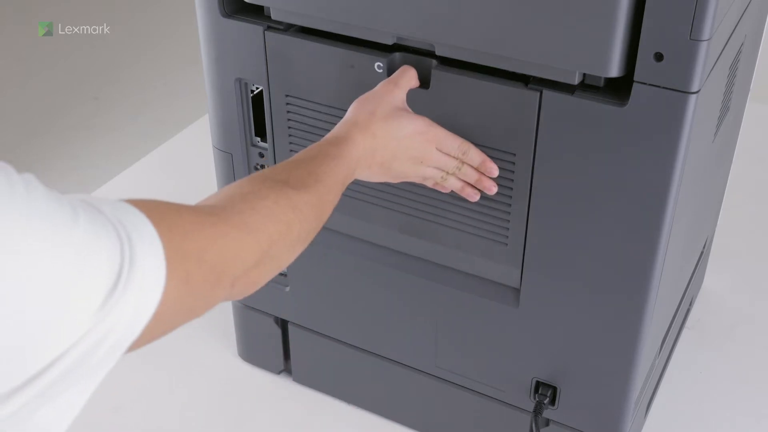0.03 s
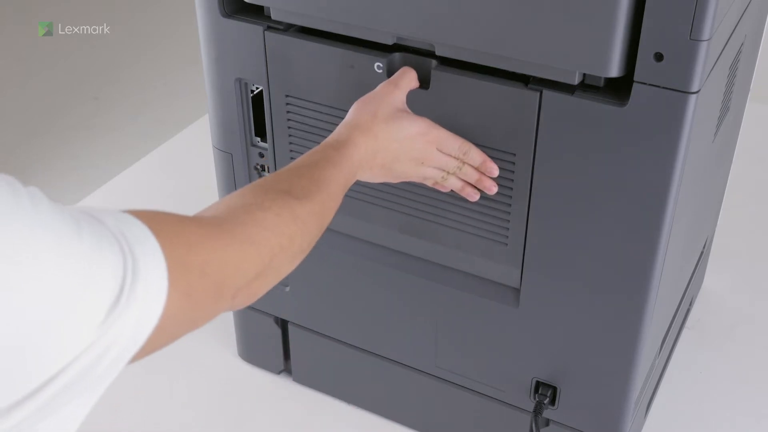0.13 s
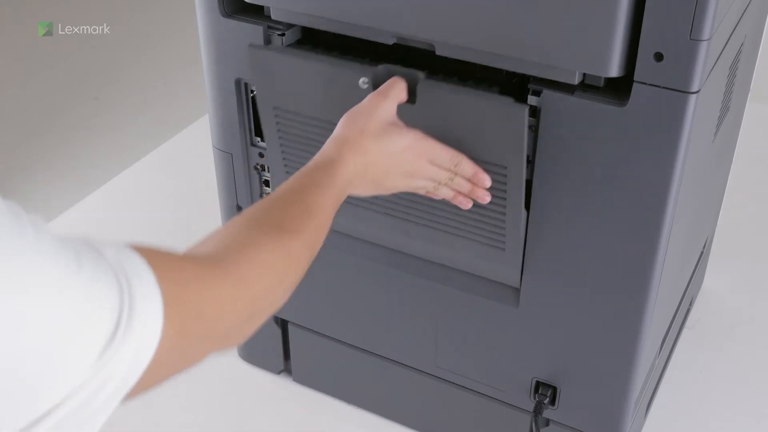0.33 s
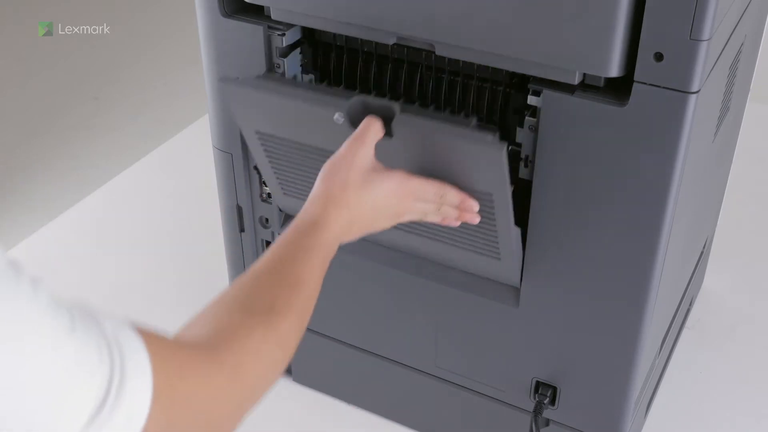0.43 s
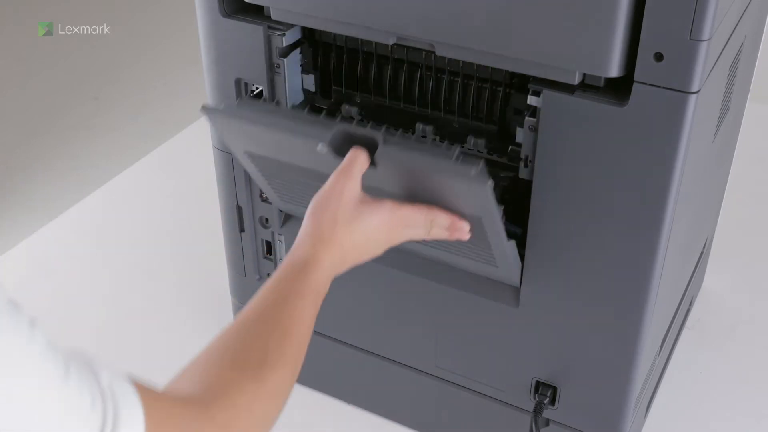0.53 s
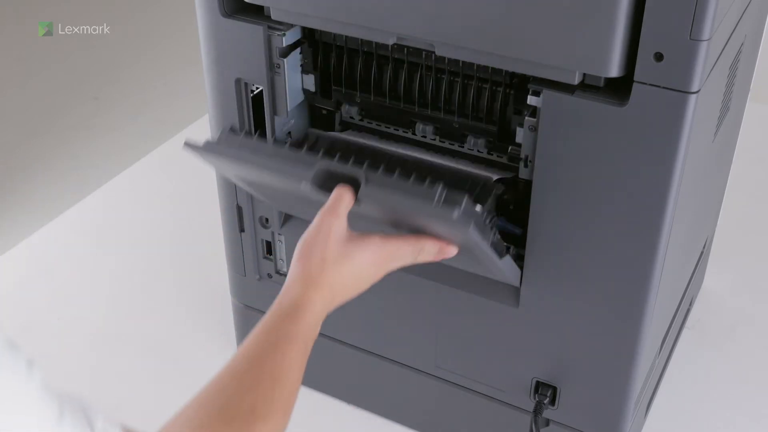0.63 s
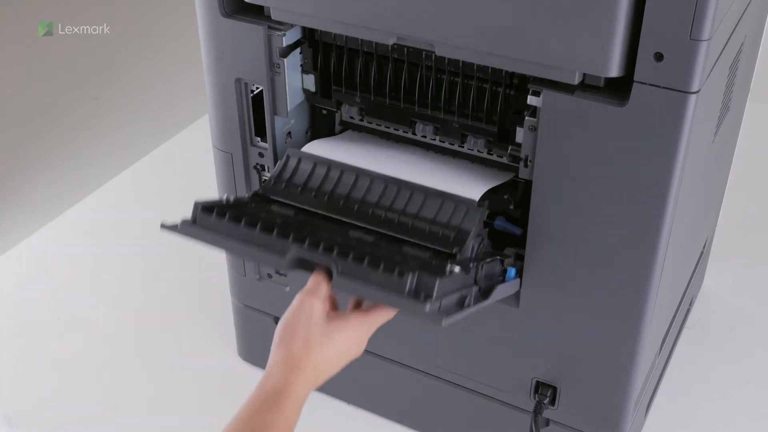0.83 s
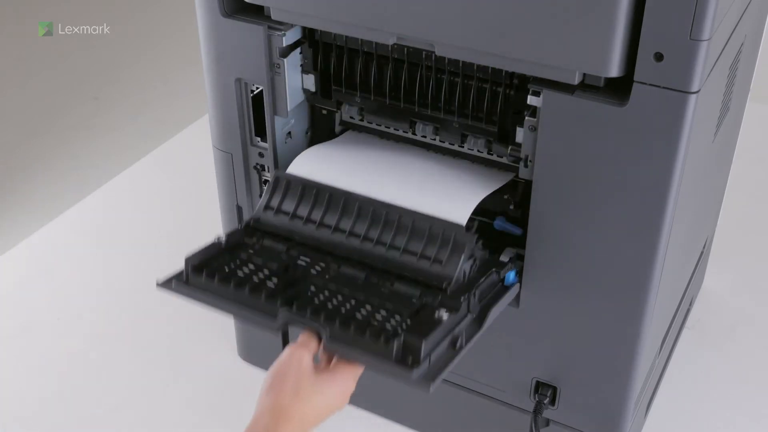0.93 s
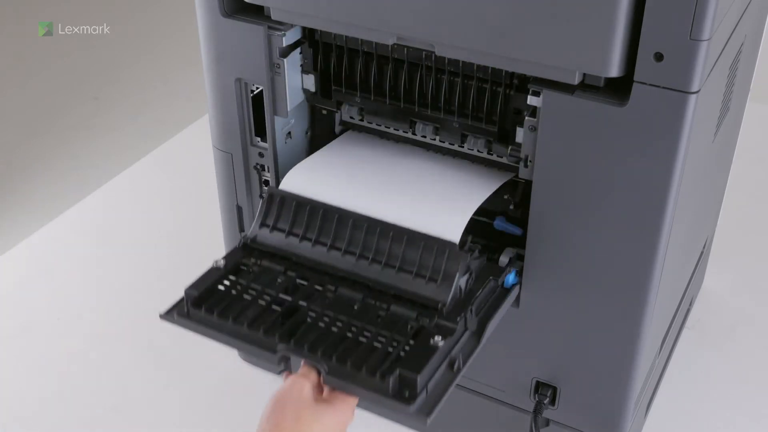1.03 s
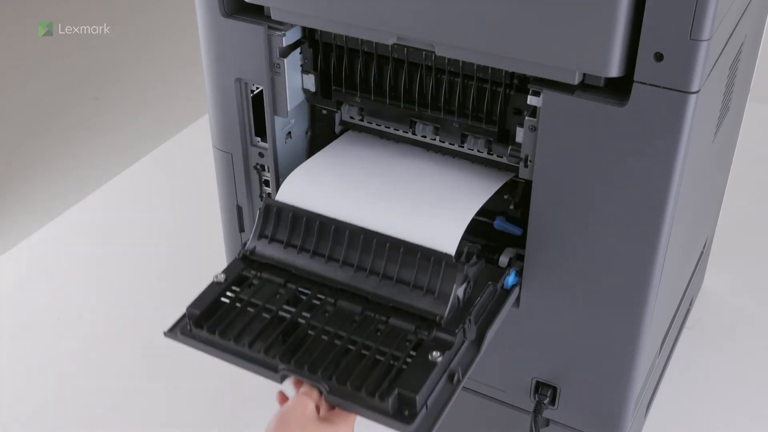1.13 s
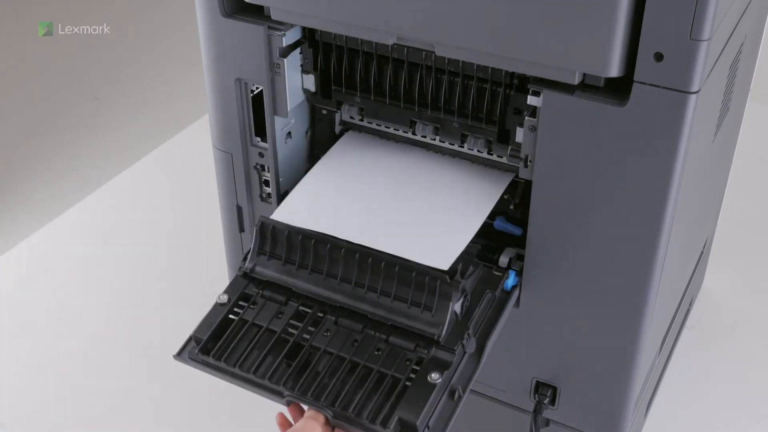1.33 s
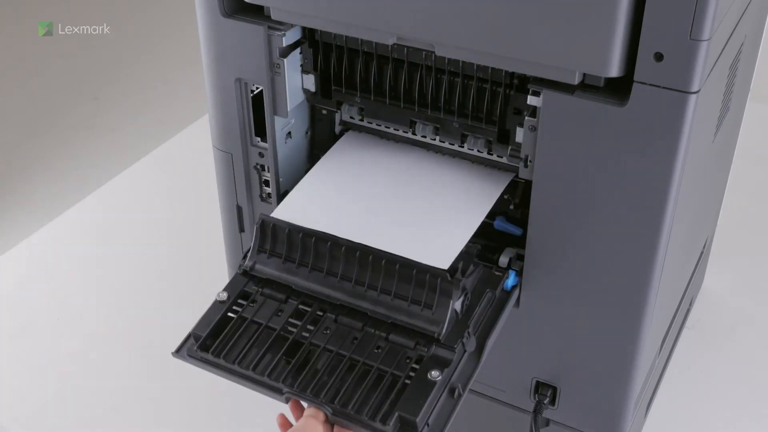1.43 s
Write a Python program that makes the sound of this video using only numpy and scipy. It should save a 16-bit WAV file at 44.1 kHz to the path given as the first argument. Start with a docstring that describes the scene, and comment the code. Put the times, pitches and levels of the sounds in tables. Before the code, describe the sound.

A printer's plastic door unlatches with a clack, then swings down, scraping and rattling.

```python
"""A plastic latch snaps over a murmur of ventilation: an office printer's rear door is lowered by hand.
The freed panel shudders against the hollow housing, each blow ringing its crowded modes.
The door slides down on its hinge and guides with a fine scrape of many tiny slips,
bumps on the way and meets its stop. The room adds a short reverberation."""
import sys
import numpy as np
from scipy import signal
from scipy.fft import rfft, irfft
from scipy.io import wavfile
from scipy.ndimage import map_coordinates

SR = 44100
rng = np.random.default_rng(int(sys.argv[2]) if len(sys.argv) > 2 else 0)


def to_wav(sig):
    """Store sig (one row per channel, or 1-D mono) as 16-bit WAV at the path in sys.argv[1].

    Samples outside -1..1 are clipped; the rate is SR.
    """
    pcm = np.clip(np.atleast_2d(sig), -1, 1) * 32767
    pcm = np.round(pcm).astype(np.int16)
    wavfile.write(sys.argv[1], SR, pcm.T)  # frames by channels


N = 66150
TIME_S, FREQ_HZ = np.arange(N) / SR, np.fft.rfftfreq(N, 1 / SR)


def amp(db):
    """Decibels to gain."""
    return 10 ** (np.asarray(db) / 20)


def unit_rms(x):
    """Each channel scaled to rms 1."""
    return x / np.sqrt(np.mean(x ** 2, -1, keepdims=True) + 1e-20)


def curve_db(table, column=1):
    """A table column interpolated over log frequency, one value per bin."""
    columns = np.transpose(table)
    return np.interp(np.log(FREQ_HZ + 1), np.log(columns[0]), columns[column])


def add(mix, start_s, sound):
    """Mixes a sound in from start_s."""
    rest = mix[:, round(start_s * SR):]
    rest += sound[:, :rest.shape[1]]


def colour(x, gain_db):
    """Filter with one gain per bin."""
    return irfft(rfft(x) * amp(gain_db), N)


def noise(spectrum_db):
    """Coloured mid and side noise, rms 1."""
    return unit_rms(colour(rng.standard_normal((2, N)), spectrum_db))


def decay(t60_s):
    """Exponential fall, 60 dB in t60_s."""
    return np.exp(-np.log(1000) * TIME_S / t60_s)


def mode(hz, db, t60_s):
    """One damped mode, random phase in the side channel."""
    phase = np.array([[0], [rng.uniform(0, 2 * np.pi)]])
    return amp(db) * decay(t60_s) * np.sin(2 * np.pi * hz * TIME_S + phase)


# Ventilation spectrum: f/Hz, level/dB
VENT_SPECTRUM = [(25, -14), (50, -13), (95, -15), (122, 0.5), (190, 0.5), (330, -1), (500, -11), (900, -20),
                 (2000, -30), (5000, -40), (10500, -37.5), (13000, -48)]


def ventilation():
    """Moving air: a steady low murmur."""
    return amp(-60) * noise(curve_db(VENT_SPECTRUM))


# Reverberation spectrum: f/Hz, level/dB
ROOM_SPECTRUM = [(100, -2), (400, 1), (2000, -1), (5000, 2.5), (12000, -14)]


def room(x, gain_db=-14, t60_s=0.37, delay_s=0.012):
    """Office reflections of the mid channel, weak in the top treble."""
    tail = noise(curve_db(ROOM_SPECTRUM)) * decay(t60_s) * (TIME_S > delay_s)
    return amp(gain_db) * signal.fftconvolve(x[:1], unit_rms(tail) / np.sqrt(N), axes=1)[:, :N]


def wander(x, depth_db=3, patch_hz=201.2, patch_s=0.0496):
    """The contact wanders, so patches of the spectrum swell and fade at random."""
    hz, t, spectra = signal.stft(x, SR, nperseg=512, noverlap=384)
    grid = np.meshgrid(hz / patch_hz, t / patch_s, indexing="ij")
    patches = map_coordinates(rng.standard_normal((400, 200)), grid, order=3, mode="wrap")
    return signal.istft(spectra * amp(depth_db * patches), SR, nperseg=512, noverlap=384)[1][:, :N]


def friction(spectrum_db, slips_per_s=900, slip_t60_s=0.04, grain_share=0.42):
    """Many tiny slips of uneven size merge into grainy noise, rms 1."""
    slips = rng.random(N) < slips_per_s / SR
    size_db = np.minimum(rng.exponential(1, N), 4)
    power = abs(signal.fftconvolve((slips * amp(size_db)) ** 2, decay(slip_t60_s) ** 2)[:N])
    envelope = np.sqrt(1 - grain_share + grain_share * power / power.mean())
    grains = envelope * rng.standard_normal((2, N))
    return unit_rms(wander(colour(grains, spectrum_db)))


# Hinge drag envelope: t/s, level/dB
DRAG_LEVELS = [(1.0, -83), (1.07, -57), (1.105, -56), (1.125, -60), (1.16, -54.5), (1.2, -60), (1.25, -75)]
# Hinge drag spectrum: f/Hz, level/dB
DRAG_SPECTRUM = [(150, -5), (300, -7), (600, -5), (900, 3), (1150, -6.5), (1550, 1), (1900, -28),
                 (4000, -31)]


def hinge_drag():
    """Late in the swing the hinge takes the weight and rubs lower."""
    level_db = np.interp(TIME_S, *np.transpose(DRAG_LEVELS), left=-np.inf, right=-np.inf)
    return amp(level_db) * friction(curve_db(DRAG_SPECTRUM))


# Sliding friction envelopes: t/s, hiss level/dB, rub level/dB
SLIDE_LEVELS = [(.25, -51, -64), (.35, -58, -53), (.44, -55, -59), (.53, -55.5, -58), (.6, -53, -55.5),
                (.7, -53.5, -56), (.8, -53.5, -54.5), (.86, -61, -54), (.96, -63.5, -55.5),
                (1.03, -68.5, -55), (1.11, -70, -60.5), (1.174, -61.5, -56), (1.205, -84, -76),
                (1.25, -81, -85), (1.31, -73, -83), (1.38, -82, -80.5), (1.45, -91, -68), (1.5, -83, -90)]
# Hiss and rub spectra: f/Hz, level/dB
HISS_SPECTRUM = [(500, -22), (1800, -4.5), (3100, 1.5), (4800, -3), (7200, 0), (7900, -4), (9200, 3.5),
                 (11500, 0), (13000, -7), (15500, -8)]
RUB_SPECTRUM = [(100, -7), (300, -16.5), (550, -2.5), (1000, -2), (1600, -3), (2100, 1), (3000, -5.5),
                (4500, -8.5), (9000, -22.5)]
# Narrow peaks and a dip in the rub: f/Hz, width/Hz, gain/dB
RUB_RESONANCES = [(504, 63, 9), (865, 39, 3), (1017, 74, 7), (1360, 110, 8), (1638, 100, -11),
                  (1865, 120, 7), (2140, 17, 5.5), (2830, 120, 4)]


def scrape():
    """The door slides: bright hiss at the contact, lower rub through the panel."""
    t, hiss_db, rub_db = np.transpose(SLIDE_LEVELS)
    peaks_db = sum(db / (1 + (2 * (FREQ_HZ - hz) / width_hz) ** 2) for hz, width_hz, db in RUB_RESONANCES)
    hiss = amp(np.interp(TIME_S, t, hiss_db)) * friction(curve_db(HISS_SPECTRUM))
    rub = amp(np.interp(TIME_S, t, rub_db)) * friction(curve_db(RUB_SPECTRUM) + peaks_db)
    return (hiss + rub) * (TIME_S > t[0])


# Modes of each small part: f/Hz, level/dB, t60/s
PART_MODES = {"latch": [(1226, -4.5, 0.076), (1708, 3.5, 0.034), (3322, -6.5, 0.044), (3580, 6.5, 0.018),
              (5830, -12, 0.044), (6527, -7, 0.036), (7560, -7, 0.055), (8500, -5, 0.032),
              (11300, -1, 0.027)], "catch": [(1283, -6, 0.062), (2120, -12, 0.047), (3120, -10, 0.054),
              (10870, 4, 0.032), (11400, 2, 0.033)], "hinge": [(289, -2.5, 0.11), (481.4, 0, 0.18),
              (649, -4, 0.12), (720, -9.5, .12)], "guide": [(600, 0, 0.067), (876, 2, 0.022),
              (954, 0, 0.061), (1857, -5, 0.084), (2865, -6, 0.11)], "stop": [(928, -8, .05),
              (986, 0, 0.069), (1118, 0, 0.046), (1376, -5, 0.052)]}
# Strikes on the parts: t/s, part, level/dB, contact/s
PART_STRIKES = [(.2342, "latch", -29, 0.003), (.3352, "catch", -37, 0.0012), (.455, "hinge", -42.5, 0.0032),
                (.4705, "hinge", -42, .004), (0.7081, "guide", -42, 0.00055), (1.2725, "stop", -39, 0.0037)]


def small_parts():
    """Latch, catch, hinge, guide and end stop are struck in turn and ring briefly."""
    out = np.zeros((2, N))
    for start_s, part, db, contact_s in PART_STRIKES:
        rise = 1 - np.exp(-TIME_S / contact_s)
        ring = sum(mode(*row) for row in PART_MODES[part])
        add(out, start_s, amp(db) * rise * ring)
    return out


# Panel bands (thump, hollow knock, clack, rib ring): f/Hz, half-width/octaves, rise/s, t60/s
PANEL_BANDS = [(190, 0.46, 0.0058, .2), (481, 0.67, 0.0018, 0.19), (1110, 0.55, 0.00036, .1),
               (1990, 0.28, .0004, 0.097)]
# Prominent panel modes, parallel lists: f/Hz, relative level/dB, t60/s
PANEL_MODE_HZ = [139, 195, 224, 336, 478, 544, 737, 862, 897, 1265, 1796, 1824, 1870, 2099, 2176, 2213,
                 2536]
PANEL_MODE_DB = [-8.5, -4, -17, -5, -7, -1, -12, -11, -10, -5.5, -12, -16, -6.5, -7.5, -16, -3.5, -11]
PANEL_MODE_T60_S = [0.23, 0.36, 0.38, 0.33, 0.91, 0.24, 0.28, 0.18, .4, 0.17, 0.23, 0.13, 0.21, 0.31, 0.29,
                    0.23, 0.2]
# Blows on the panel: t/s, then level/dB for each of the four bands
PANEL_BLOWS = [(0.2339, -35, -42.5, -40.5, -43.5), (.243, -59, -46, -38, -43),
               (0.2523, -41.5, -35.5, -32.5, -31), (.2635, -44.5, -38.5, -50, -32.5),
               (0.2714, -32, -53, -42, -43), (.2935, -37, -41, -40.5, -37.5), (.334, -50, -43, -44, -50),
               (.368, -54.5, -46.5, -44.5, -58), (.383, -49, -57, -50.5, -67), (.454, -68, -47, -52, -54.5),
               (.465, -56, -49, -52.5, -67), (.475, -60, -52, -50.5, -56), (.708, -67, -55.5, -47, -56),
               (.768, -60, -72, -62, -51), (1.02, -67, -60.5, -54.5, -56.5), (1.266, -60, -56, -52, -61),
               (1.275, -68, -59.5, -53, -59), (1.337, -69, -76, -73.5, -71.5), (1.44, -70, -59, -61, -64.5)]


def panel_knocks(crowd_db=-1, ring_db=-5, crack_db=-8, crack_t60_s=0.0044):
    """Each blow cracks and rings four bands of crowded modes; their balance depends on where it lands."""
    out = np.zeros((2, N))
    centres_hz = np.array(PANEL_BANDS)[:, 0]
    rings = np.zeros((len(PANEL_BANDS), 2, N))
    for hz, db, t60_s in zip(PANEL_MODE_HZ, PANEL_MODE_DB, PANEL_MODE_T60_S):
        nearest_band = np.argmin(abs(np.log(centres_hz / hz)))
        rings[nearest_band] += mode(hz, db + ring_db, t60_s)
    for band, (hz, octaves, rise_s, t60_s) in enumerate(PANEL_BANDS):
        band_db = -10 * np.log10(1 + (np.log2((FREQ_HZ + 1) / hz) / octaves) ** 8)
        rise = 1 - np.exp(-TIME_S / rise_s)
        fall = amp(crowd_db) * decay(t60_s) + amp(crack_db) * decay(crack_t60_s)
        for start_s, *levels_db in PANEL_BLOWS:
            add(out, start_s, amp(levels_db[band]) * rise * (fall * noise(band_db) + rings[band]))
    return out


# Plastic edge snaps: t/s, level/dB, contact/s
SNAPS = [(0.2338, -27.5, 0.0015), (0.2357, -27, 0.00063), (0.3318, -40.5, 0.0032), (0.3366, -31, 0.00073),
         (.695, -53, .006), (.703, -43, 0.0045), (.797, -57, 0.0079), (1.016, -56, 0.0027),
         (1.079, -61.5, 0.0026), (1.191, -66, 0.0036), (1.2632, -50, 0.0021), (1.2695, -53.5, 0.0072),
         (1.4, -68, 0.005), (1.418, -63.5, 0.0041), (1.438, -61.5, 0.0026)]
# Snap spectrum: f/Hz, level/dB
SNAP_SPECTRUM = [(300, -44), (1200, 8.5), (2500, 4), (3400, 4), (4700, -6.5), (6500, 0), (8500, -1),
                 (11200, 4.5), (13000, -5.5), (16000, -4.5)]


def edge_snaps(push_t60_s=0.076, tail_db=-14, tail_t60_s=0.24):
    """Hard plastic edges snap past each other: a brief crack, then a tail dying inside the housing."""
    out = np.zeros((2, N))
    for start_s, db, contact_s in SNAPS:
        push = decay(push_t60_s) ** 2 * (TIME_S < contact_s)
        crack_power = signal.lfilter([1], [1, -np.exp(-1 / (SR * contact_s))], push)
        tail = amp(tail_db) * decay(tail_t60_s) * np.minimum(TIME_S / contact_s, 1)
        envelope = np.sqrt(crack_power / crack_power.max() + tail ** 2)
        add(out, start_s, amp(db) * envelope * noise(curve_db(SNAP_SPECTRUM)))
    return out


# Stereo image: f/Hz, side re mid/dB, left re right/dB
STEREO_IMAGE = [(40, -24, 4.5), (129, -42, -0.5), (270, -21, 0), (610, -10.5, -1.5), (1360, -0.5, -3.5),
                (2230, -5, -2), (4750, -8, 0.5), (7640, -16, 0), (15000, -71, 0)]


def scene():
    """Door, room and ventilation in mid and side, spread to left and right."""
    door = edge_snaps() + small_parts() + panel_knocks() + scrape() + hinge_drag()
    mid, side = door + room(door) + ventilation()
    side_db, lean_db = curve_db(STEREO_IMAGE), curve_db(STEREO_IMAGE, column=2)
    side = colour(side, side_db)
    equal_power_db = -10 * np.log10(1 + amp(side_db) ** 2)
    left = colour(mid + side, equal_power_db + lean_db / 2)
    right = colour(mid - side, equal_power_db - lean_db / 2)
    return np.array([left, right])


# Microphone treble response: f/Hz, gain/dB
MIC_TREBLE = [(13500, -0.5), (14800, -7.5), (15600, -4)]
LOW_CUT_HZ, BAND_LIMIT_HZ = 74, 15650


def record(dry):
    """Microphone: soft top, low cut, band limit."""
    low_cut = signal.butter(3, LOW_CUT_HZ, "high", fs=SR, output="sos")
    band_limit = signal.firwin(401, BAND_LIMIT_HZ, window=("kaiser", 9), fs=SR)
    softened = colour(dry, curve_db(MIC_TREBLE))
    return signal.oaconvolve(signal.sosfilt(low_cut, softened), band_limit[None], "same")


dry = scene()
out = record(dry)
to_wav(out)
```